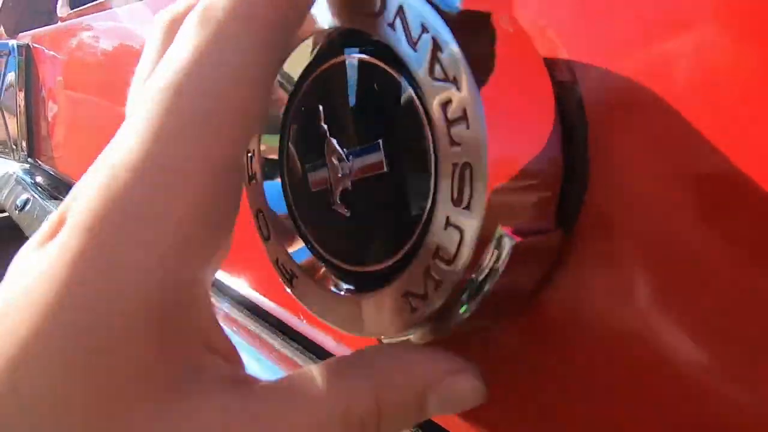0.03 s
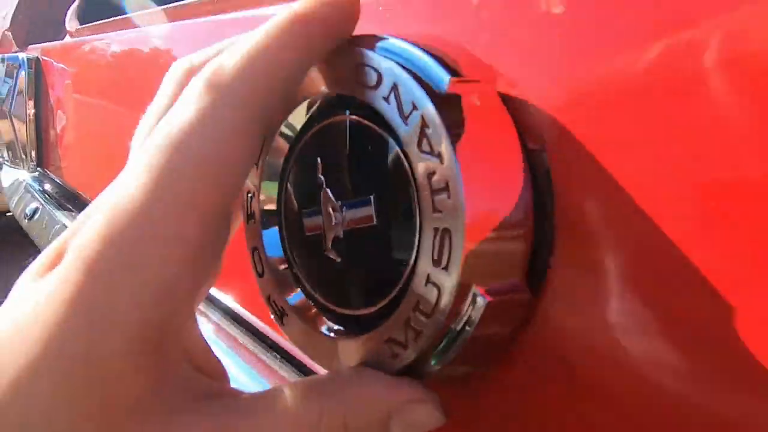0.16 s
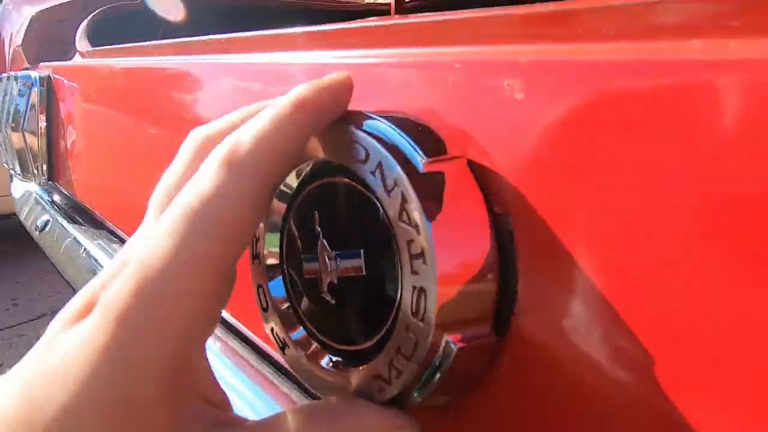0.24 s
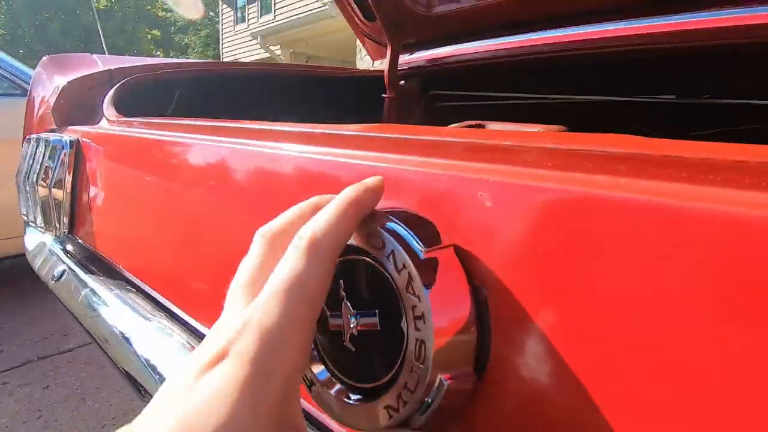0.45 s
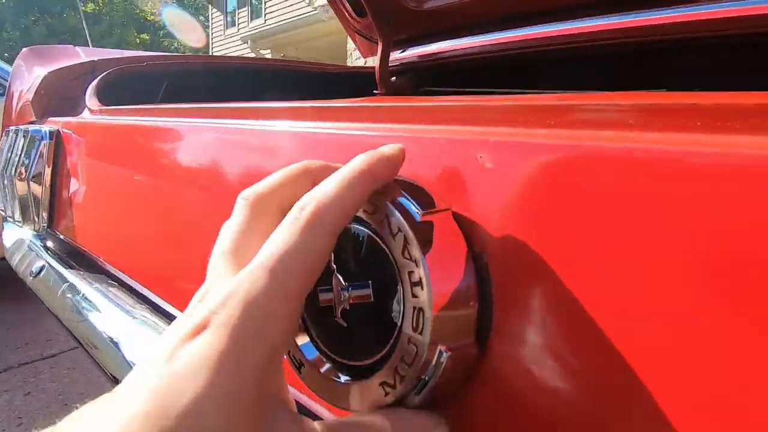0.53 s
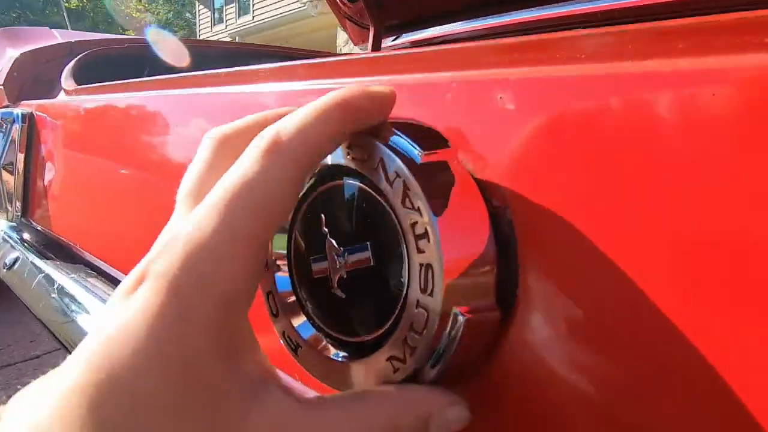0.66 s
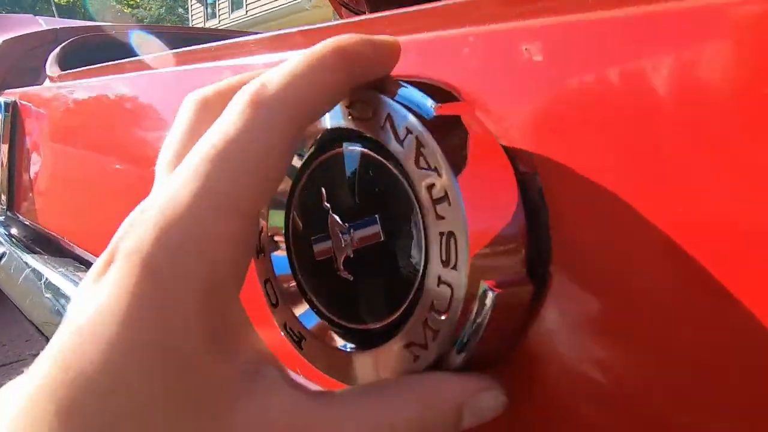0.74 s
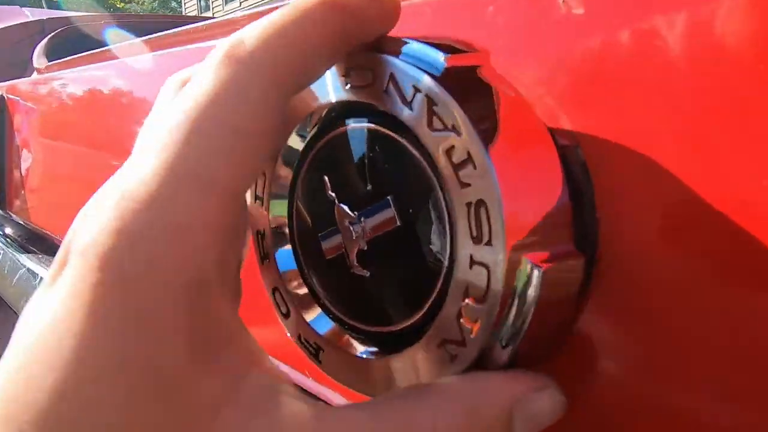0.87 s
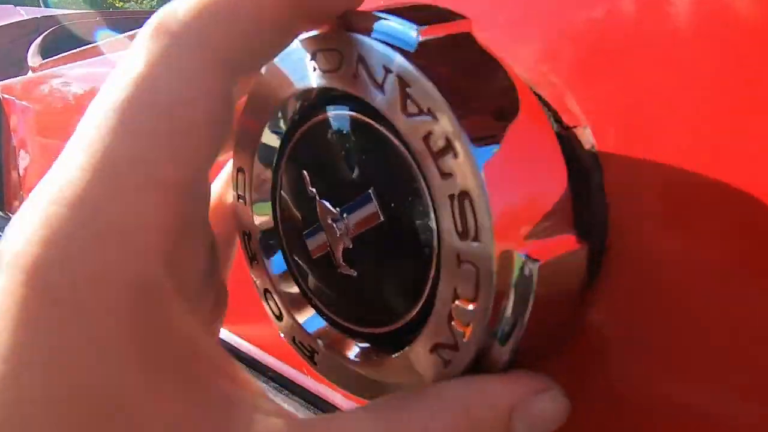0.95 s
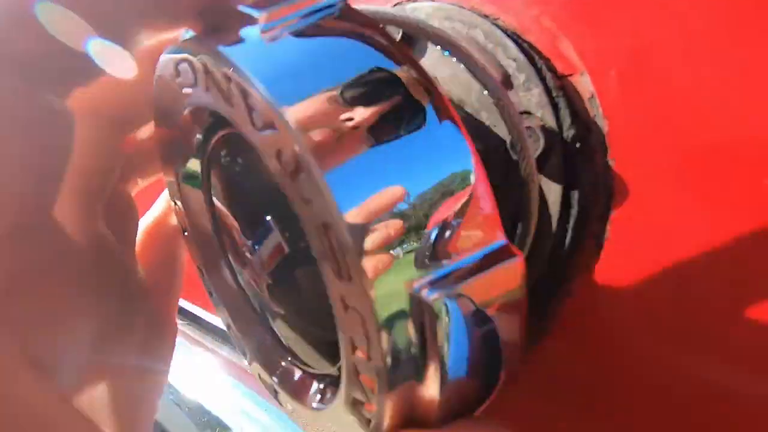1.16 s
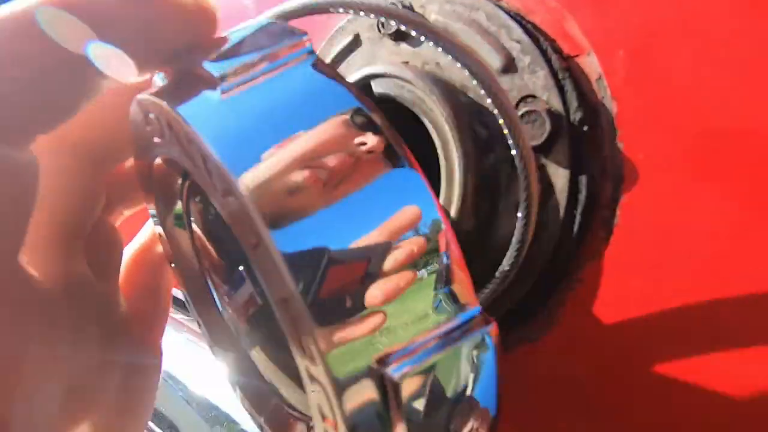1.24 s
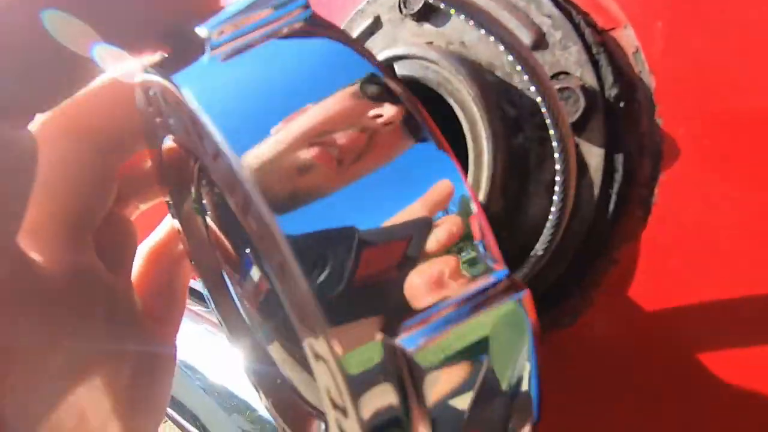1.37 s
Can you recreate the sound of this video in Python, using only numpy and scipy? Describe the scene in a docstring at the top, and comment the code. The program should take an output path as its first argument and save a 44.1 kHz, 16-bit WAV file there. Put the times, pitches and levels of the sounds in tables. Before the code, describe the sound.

A metal fuel cap is turned by hand, very close, outdoors. Faint clicks begin at 0.07 seconds; a hollow, gritty grind with dull knocks and sharp clicks runs from 0.2 to 0.5. Quiet scrapes and light taps follow, then a low panel thump at 1.0, a thump with ringing clank and crunch at 1.12, and tiny rattles around 1.2. Soft air, low hum and handling rumble lie beneath; the cap leans right.

```python
"""Soft outdoor air, made of shaped noise, and a low hum of sines; then a metal fuel cap is twisted close by.
Random slips through resonances grind it round its seat, with dull sine jerks as it sticks.
Noise clacks click, grainy strokes scrape, and decaying sines make the rim ring and the body panel thump.
Late on, the cap clanks and crunches on the filler neck in ringing modes and rattles in bursts of ticks.
Handling rumbles underneath; scattered sound spreads the cap, which leans right and less so by the end."""
import sys
import numpy as np
from scipy import signal
from scipy.fft import rfft, irfft, next_fast_len
from scipy.io import wavfile
from scipy.ndimage import uniform_filter1d, map_coordinates

SR = 44100
rng = np.random.default_rng(int(sys.argv[2]) if len(sys.argv) > 2 else 0)


def digitize_waveform(pressure):
    """Quantize a signal to 16-bit integers and store it at the path in sys.argv[1].

    Rows of a 2-D input are taken as channels; values are limited to [-1, 1].
    """
    field = np.atleast_2d(pressure).T
    bounded = np.clip(field, -1, 1)
    quanta = np.round(bounded * 32767).astype(np.int16)
    wavfile.write(sys.argv[1], SR, quanta)


N = 61739  # length [samples]

# Outdoor air: (frequency [Hz], relative level [dB])
AIR_TONE = [(15, -30), (25, -0.5), (100, -8.5), (240, -8), (420, -18), (620, -27), (800, -19),
            (1000, -25.5), (3000, -32.5), (6600, -32.5), (8500, -41), (12400, -64), (15000, -77)]
# Width of the air: (frequency [Hz], gain of the side signal [dB])
AIR_SIDE_TONE = [(30, 4), (100, -13.5), (300, -15.5), (1000, -5), (5000, 0)]
# Hum harmonics: (multiple of the hum pitch, relative level [dB])
HUM_HARMONICS = [(2, -6), (3, -14.5), (4, -28), (5, -15), (6, -30.5)]
# Handling rumble over time: (time [s], level [dB])
RUMBLE_LEVEL = [(0, -55), (.17, -38), (.235, -32.5), (.32, -30.5), (.42, -33), (.48, -33.5), (.67, -43.5),
                (.77, -39.5), (.95, -41), (1.03, -27.5), (1.15, -38.5), (1.23, -34), (1.38, -75)]
# Tone of the rumble: (frequency [Hz], relative level [dB])
RUMBLE_SPECTRUM = [(15, -6), (30, -8.5), (60, -3.5), (120, 1), (260, -7.5), (2000, -100)]
AIR_DB, HUM_HZ, HUM_DB = -45.5, 48.72, -43

# Cap grinding on its seat: (time [s], hollow body before trim [dB], grit before trim [dB])
GRIND_LEVELS = [(.03, -55, -66), (.065, -42, -53), (.16, -48.5, -46.5), (.2, -33.5, -43.5),
                (.255, -25.5, -40), (.272, -19, -28), (.305, -18, -31.5), (.35, -17.5, -25),
                (.37, -29.5, -37.5), (.41, -20.5, -38), (.435, -26, -35), (.475, -32, -47),
                (.535, -34, -51.5), (.6, -45, -81), (.72, -44.5, -72), (.8, -82, -95)]
# Resonances of the hollow neck: (frequency [Hz], relative level [dB])
HOLLOW_MODES = [(190, -16), (256, -1), (352, -0.5), (410, 1.5), (450, -6), (496, -6.5), (555, -3),
                (614, -6.5), (696, -5.5), (826, -15.5), (1125, -16.5)]
# Tone of the grit: (frequency [Hz], relative level [dB])
GRIT_TONE = [(300, -59), (750, 5), (1150, 4.5), (1700, -4), (3000, -5), (4500, -16), (6600, -24),
             (8000, -30.5), (12200, -31.5), (15000, -53)]
# Jerks of the sticking cap: (time [s], peak level [dB], pitch [Hz], rise [s], t60 [s])
CAP_JERKS = [(0.2161, -16, 555, 0.0016, 0.031), (0.22, -27, 61.7, 0.011, 0.44),
             (0.235, -19.5, 395, 0.0013, 0.033), (0.2696, -18, 505, 0.0016, 0.024),
             (.298, -23.5, 266.7, 0.0089, 0.15), (.302, -11, 479, 0.0058, 0.044),
             (.319, -16.5, 647, 0.0038, 0.094), (.322, -16.5, 454, 0.0033, 0.047),
             (0.358, -28.5, 193.7, 0.0076, 0.23), (0.402, -17.5, 421.6, 0.012, 0.052),
             (0.434, -20, 449, 0.0055, 0.065), (0.499, -27.5, 195, 0.0033, 0.25),
             (.555, -33, 830, .002, .06), (.763, -25.5, 650, 0.00075, 0.03),
             (0.814, -34.5, 244, 0.024, 0.25)]
HOLLOW_WIDTH_HZ, HOLLOW_TRIM_DB, SLIPS_PER_S = 35, -3.5, 500
GRIT_TRIM_DB, GRAINS_PER_S = -1, 2800
GRAIN_SPREAD_DB = 4  # unevenness of the grains in grit, scrapes and rattle
EVEN_S = 0.014  # window for holding a noise steady

# Cap resonances colouring grit, scrapes and clicks: (frequency [Hz], width [Hz], relative level [dB])
CAP_MODES = [(1200, 46, -2.5), (1685, 26, -6), (2290, 31, -6.5), (2668, 14, -2), (3926, 86, -4),
             (5500, 120, -5.5), (6400, 70, -1.5)]
CAP_TRIM_DB = -3

# Clicks of the rim, before the cap's colour:
# (time [s], clack level [dB], clack pitch [Hz], bright tick level [dB])
RIM_CLICKS = [(0.068, -40.5, 2980, -63), (.083, -34, 3030, -54), (0.151, -30.5, 2680, -51),
              (.196, -29.5, 1780, -47), (.288, -26, 2140, -30), (0.312, -25, 2550, -51),
              (0.3366, -29, 2900, -50), (0.3525, -20, 3080, -35), (0.425, -33, 2720, -50),
              (0.4344, -40, 3520, -26.5), (.437, -29, 3700, -32.5), (.460, -34, 2510, -76),
              (0.64, -39.5, 2870, -46.5), (0.763, -35.5, 4840, -55), (0.9607, -32.5, 2294, -53),
              (.998, -30, 2330, -50), (1.073, -37, 3100, -42), (1.1153, -25, 3350, -39),
              (1.132, -37, 3170, -46), (1.293, -33, 4350, -50.5), (1.348, -38, 4220, -43)]
# Tone of a clack pitched at CLACK_HZ: (frequency [Hz], relative level [dB])
CLACK_TONE = [(300, -52), (1200, -11.5), (2200, 1), (3000, 3), (4000, -3.5), (5500, -14.5), (15000, -47.5)]
# Tone of the bright tick: (frequency [Hz], relative level [dB])
TICK_TONE = [(1500, -2), (4000, 1.5), (5600, 8.5), (6700, 2.5), (7800, -11), (10000, 0.5), (11200, -12),
             (12500, -7), (15000, -28)]
# Rim ringing on after the hardest click, before the cap's colour:
# (frequency [Hz], mean level [dB], t60 [s])
RIM_MODES = [(2660, -46, 0.36), (6670, -50, 0.29), (8700, -56, 0.46), (9100, -52, .19), (12100, -44, 0.065)]
CLACK_HZ, RIM_S = 3000, 0.3532
CLICK_T60_S, CLICK_TAIL_DB, CLICK_TAIL_T60_S = 0.014, -19.5, 0.097

# Light metal scrapes, before the cap's colour:
# (time [s], length [s], level [dB], fade over the length [dB], tilt above 800 Hz [dB per octave])
METAL_SCRAPES = [(0.33, 0.032, -20, 8.5, -13), (0.555, 0.017, -34.5, -2.5, -2.5),
                 (0.686, 0.019, -39.5, 1.5, -0.5), (0.705, 0.014, -35.5, 1.5, 5),
                 (0.712, 0.059, -42, -0.5, -1), (0.907, 0.024, -36, 10.5, 0.5),
                 (0.923, 0.061, -41.5, -4, -9), (0.997, 0.078, -27.5, 24, -8.5),
                 (1.112, 0.025, -33, 2.5, -2.5), (1.147, 0.044, -35, 6.5, -11), (1.19, 0.093, -46, 0.5, -3),
                 (1.341, .02, -46.5, -1.5, -0.5)]
# Tone of a scrape before its tilt: (frequency [Hz], relative level [dB])
SCRAPE_TONE = [(200, -0.5), (600, 1.5), (900, 0), (1500, 3.5), (3000, 1), (4500, -9.5), (6500, -13.5),
               (8500, -22.5), (12000, -32.5), (15000, -50)]
BURST_RISE_S, SCRAPE_T60_S = 0.0015, 0.054

# Thumps into the body panel:
# (time [s], level [dB], lowest mode [Hz], second mode [Hz], t60 of these two [s], upper modes [dB])
PANEL_THUMPS = [(.768, -34, 101, 152.2, 0.84, 7), (.925, -29, 111.6, 140, 0.83, -12.5),
                (0.9982, -12, 119, 141, 0.12, -4.5), (1.118, -17, 130.4, 149.6, 0.12, 0.5)]
# Upper modes of the panel: (frequency [Hz], mean relative level [dB], t60 [s])
PANEL_MODES = [(246, -6, 0.25), (288, -9.5, 0.26), (360.7, -14.5, 0.29), (426.5, -14, 0.13),
               (584, -22.5, 0.32), (630, -20.5, 0.27)]
# Modes of the neck under the clank and crunch: (frequency [Hz], relative level [dB], t60 of the clank [s])
NECK_MODES = [(771, 5.5, 0.13), (930, -5, 0.06), (1080, -2, 0.069), (1188, 1, 0.064), (1387, 1, 0.055),
              (1462, 4, 0.057), (1807, -7.5, 0.12), (2160, -19, 0.1)]
UPPER_RISE_S = 0.0032
CLANK_S, CLANK_DB = 1.1153, -31.5
CRUNCH_LENGTH_S, CRUNCH_DB, CRUNCH_WIDTH_HZ = 0.031, -30.5, 85

# Rattle bursts of the loose cap: (time [s], length [s], level [dB])
RATTLE_BURSTS = [(1.183, .002, -51), (1.195, .01, -52), (1.2102, 0.0037, -46), (1.222, 0.0046, -40.5),
                 (1.238, .013, -46), (1.273, .002, -54)]
# Resonances of the rattle: (frequency [Hz], width [Hz], relative level [dB])
RATTLE_RESONANCES = [(2320, 500, -3.5), (3270, 580, -1), (3860, 480, -2.5), (5630, 430, -4.5),
                     (6480, 170, 0), (9800, 450, -17)]

# Full stereo balance: (frequency [Hz], left over right [dB])
FULL_BALANCE = [(100, -4), (300, 1.6), (600, -5.5), (2500, -4.5), (6000, -11), (12000, -27)]
# Lean of the cap over time: (time [s], share of the full balance [0 to 1])
CAP_LEAN = [(.1, 0.95), (.35, 0.75), (.45, 1), (.7, 0.52), (.95, 0.61), (1.3, 0.37)]
# Sound thrown back by the bodywork: (frequency [Hz], level in the side signal [dB])
SCATTER_TONE = [(100, -37), (300, -31), (600, -10.5), (1200, -5), (2500, -9.5), (5000, -7.5), (12000, 0.5)]
SCATTER_T60_S = 0.04
TOP_HZ = 15400  # band limit


def amp(db):
    """Decibels to gain."""
    return 10 ** (np.asarray(db) / 20)


def unit(x):
    """Scale to rms 1."""
    return x / np.sqrt(np.mean(x ** 2) + 1e-20)


def along(points, hz):
    """Read (Hz, value) points on a log frequency axis."""
    f, v = np.transpose(points)
    return np.interp(np.log(hz + 1), np.log(f + 1), v)


def since(s):
    """Seconds since time s, zero before it."""
    return np.maximum(np.arange(N) / SR - s, 0)


def curves(rows):
    """One value per sample for each column after the time."""
    s, *columns = np.transpose(rows)
    return [np.interp(since(0), s, column) for column in columns]


def fade(t, t60):
    """Exponential decay, 60 dB down after t60 seconds."""
    return np.exp(-np.log(1000) * t / t60)


def burst(s, length, t60):
    """Quick rise at s, hold for the length, then an exponential release."""
    rise = 1 - np.exp(-since(s) / BURST_RISE_S)
    return rise * fade(since(s + length), t60)


def filtered(x, response):
    """Multiply the spectrum of x by a response of frequency."""
    m = 2 * next_fast_len(N)
    hz = np.fft.rfftfreq(m, 1 / SR)
    return irfft(rfft(x, m) * response(hz), m)[..., :N]


def coloured(x, points, tilt_db=0):
    """Causal filter through (Hz, dB) points, tilted per octave above 800 Hz."""
    def response(hz):
        octaves = np.log2(np.maximum(hz, 800) / 800)
        cepstrum = irfft(np.log(amp(along(points, hz) + tilt_db * octaves)))
        # fold the cepstrum forward in time: minimum phase, no pre-echo
        half = len(cepstrum) // 2
        cepstrum[1:half] *= 2
        cepstrum[half + 1:] = 0
        return np.exp(rfft(cepstrum))
    return filtered(x, response)


def resonance(f, hz, width_hz):
    """Band-pass response of one damped resonance, with unit gain at its centre."""
    return 1j * f * width_hz / (hz * hz - f * f + 1j * f * width_hz)


def resonant(x, modes):
    """Pass x through (Hz, width Hz, dB) resonances of alternating sign."""
    def response(f):
        return sum((-1) ** k * amp(db) * resonance(f, hz, width)
                   for k, (hz, width, db) in enumerate(modes))
    return filtered(x, response)


def through_cap(x):
    """The cap's resonances stand out of a contact noise."""
    def response(f):
        return 1 + sum(amp(db) * resonance(f, hz, width) for hz, width, db in CAP_MODES)
    return amp(CAP_TRIM_DB) * filtered(x, response)


def even(x):
    """Hold a noise at rms 1 from moment to moment."""
    power = np.abs(uniform_filter1d(x ** 2, size=int(EVEN_S * SR)))
    return x / np.sqrt(power + 1e-20)


def slips(rate, spread_db, smooth):
    """Tiny random slips of uneven size, rate per second on average, over smooth friction noise."""
    happens = rng.random(N) < rate / SR
    sign = rng.choice([-1, 1], N)
    size = amp(spread_db * np.clip(rng.standard_normal(N), -2, 2))
    return unit(happens * sign * size) + smooth * rng.standard_normal(N)


def ring(s, modes, rise_s, vary_db, scatter=0):
    """Damped modes struck at time s, with varied levels; scatter spreads their phases."""
    t = since(s)
    out = np.zeros(N)
    for hz, db, t60 in modes:
        level = amp(db + vary_db * rng.standard_normal())
        out += level * fade(t, t60) * np.sin(2 * np.pi * (hz * t + scatter * rng.random()))
    return (1 - np.exp(-t / rise_s)) * out


def background():
    """Shaped noise for outdoor air, a phase-wobbled harmonic hum and low noise for handling rumble."""
    mid, side = unit(coloured(rng.standard_normal((2, N)), AIR_TONE))
    side = filtered(side, lambda hz: amp(along(AIR_SIDE_TONE, hz)))
    air = amp(AIR_DB) * np.array([mid + side, mid - side])
    # 8 random phase targets a second, joined by straight lines
    wobble = map_coordinates(rng.standard_normal(N), [since(0) * 8], order=1)
    turn = 2 * np.pi * HUM_HZ * since(0) + 0.13 * wobble
    hum = sum(amp(db) * np.sin(k * turn + 2 * np.pi * rng.random()) for k, db in HUM_HARMONICS)
    rumble = unit(coloured(rng.standard_normal(N), RUMBLE_SPECTRUM))
    return air + amp(HUM_DB) * unit(hum) + amp(curves(RUMBLE_LEVEL)[0]) * rumble


def grinding():
    """Slips excite the hollow neck; finer grit rasps above; the cap jerks on in dull knocks."""
    hollow_db, grit_db = curves(GRIND_LEVELS)
    neck = [(hz, HOLLOW_WIDTH_HZ, db) for hz, db in HOLLOW_MODES]
    hollow = even(resonant(slips(SLIPS_PER_S, spread_db=1.0, smooth=0.64), neck))
    grains = slips(GRAINS_PER_S, spread_db=GRAIN_SPREAD_DB, smooth=0.52)
    grit = even(through_cap(coloured(grains, GRIT_TONE)))
    out = amp(hollow_db + HOLLOW_TRIM_DB) * hollow + amp(grit_db + GRIT_TRIM_DB) * grit
    for s, db, hz, rise, t60 in CAP_JERKS:
        t = since(s)
        shape = (1 - np.exp(-(t / rise) ** 2)) * fade(t, t60)
        out += amp(db) * shape / shape.max() * np.sin(2 * np.pi * hz * t)
    return out


def clicking():
    """Each click is a pitched noise clack and a bright tick with a faint tail; the rim rings after one."""
    out = np.zeros(N)
    tick_noise = coloured(rng.standard_normal(N), TICK_TONE)
    for s, clack_db, hz, tick_db in RIM_CLICKS:
        t = since(s)
        tail = amp(CLICK_TAIL_DB) * fade(t, CLICK_TAIL_T60_S)
        shape = (t > 0) * (fade(t, CLICK_T60_S) + tail)
        tone = [(f * hz / CLACK_HZ, db) for f, db in CLACK_TONE]
        clack = unit(coloured(shape * rng.standard_normal(N), tone))
        tick = unit(shape * tick_noise)
        # give back the energy of the envelope after levelling
        out += (amp(clack_db) * clack + amp(tick_db) * tick) * np.sqrt(np.mean(shape ** 2))
    return out + ring(RIM_S, RIM_MODES, rise_s=0.00045, vary_db=2.0)


def scraping():
    """Short strokes of the rim over the neck: bursts of grainy slips, each with its own tilt and fade."""
    out = np.zeros(N)
    for s, length, db, fade_db, tilt_db in METAL_SCRAPES:
        progress = np.minimum(since(s) / length, 1)
        shape = burst(s, length, SCRAPE_T60_S) * amp(-fade_db * progress)
        grains = slips(1800, spread_db=GRAIN_SPREAD_DB, smooth=0.53)
        out += amp(db) * shape * even(coloured(grains, SCRAPE_TONE, tilt_db))
    return out


def thumping():
    """Two close low modes of opposite sign boom in the body panel under its damped upper modes."""
    out = np.zeros(N)
    for s, db, low_hz, high_hz, t60, upper_db in PANEL_THUMPS:
        t = since(s)
        pair = np.sin(2 * np.pi * low_hz * t) - np.sin(2 * np.pi * high_hz * t)
        upper = ring(s, PANEL_MODES, UPPER_RISE_S, vary_db=2)
        out += amp(db) * (fade(t, t60) * pair + amp(upper_db) * upper)
    return out


def clanking():
    """The cap strikes damped modes of the neck and crunches along it as noise through the same modes."""
    clank = ring(CLANK_S, NECK_MODES, rise_s=0.0004, vary_db=1, scatter=1)
    modes = [(hz, CRUNCH_WIDTH_HZ, db) for hz, db, _ in NECK_MODES]
    crunch = even(resonant(rng.standard_normal(N), modes))
    shape = burst(CLANK_S, CRUNCH_LENGTH_S, SCRAPE_T60_S)
    return amp(CLANK_DB) * clank + amp(CRUNCH_DB) * shape * crunch


def rattling():
    """The loosened cap chatters in short bursts of tiny, ringing ticks."""
    ticks = even(resonant(slips(900, spread_db=GRAIN_SPREAD_DB, smooth=0), RATTLE_RESONANCES))
    return ticks * sum(amp(db) * burst(s, length, CLICK_T60_S) for s, length, db in RATTLE_BURSTS)


def scattered(cap):
    """The bodywork throws the cap's sound back as a short decaying noise echo."""
    echoes = rng.standard_normal(N) * fade(since(0), SCATTER_T60_S)
    echoed = signal.fftconvolve(cap, echoes / np.linalg.norm(echoes))[:N]
    return filtered(echoed, lambda hz: amp(along(SCATTER_TONE, hz)))


def leaning(cap):
    """Side signal that sets the left-right balance at each frequency, scaled by the lean over time."""
    full = filtered(cap, lambda hz: 1 - 2 / (1 + amp(along(FULL_BALANCE, hz))))
    return curves(CAP_LEAN)[0] * full


def scene():
    """The cap leans right by a varying amount, its scattered sound spread wide, over the background."""
    outdoors = background()
    cap = grinding() + through_cap(clicking() + scraping()) + thumping() + clanking() + rattling()
    side = scattered(cap) + leaning(cap)
    return np.array([cap + side, cap - side]) + outdoors


def record(dry):
    """Nothing is kept at or above the band limit."""
    return filtered(dry, lambda hz: hz < TOP_HZ)


dry = scene()
out = record(dry)
digitize_waveform(out)
```